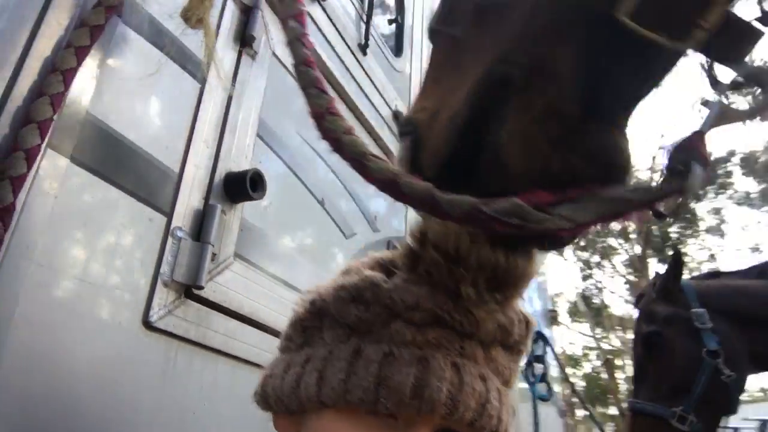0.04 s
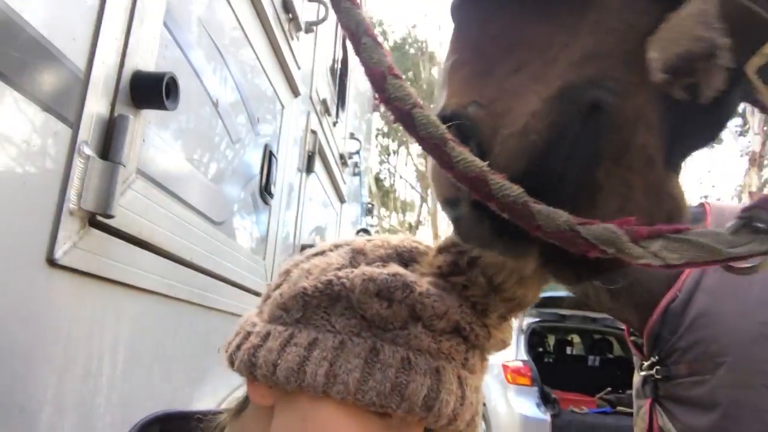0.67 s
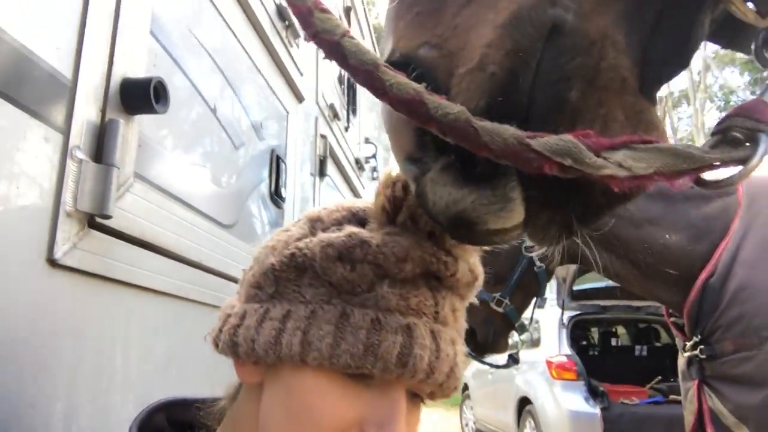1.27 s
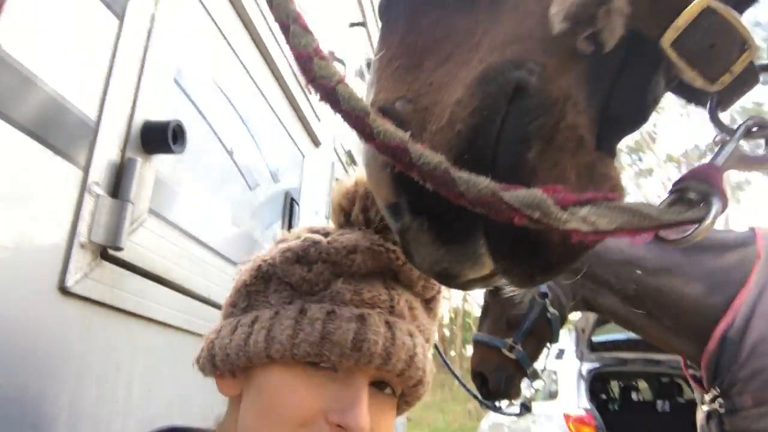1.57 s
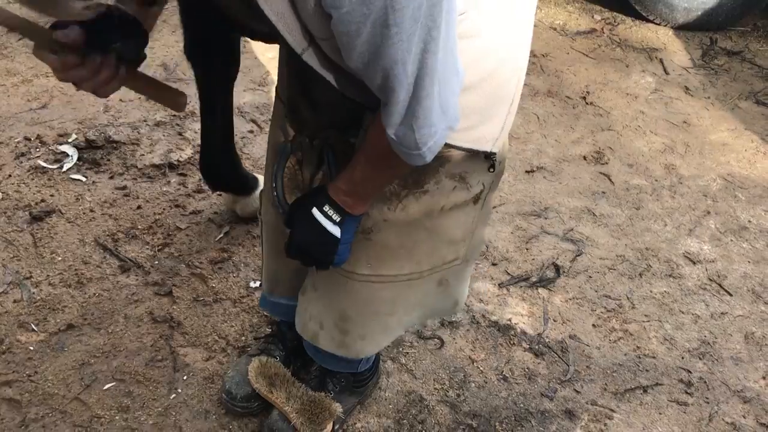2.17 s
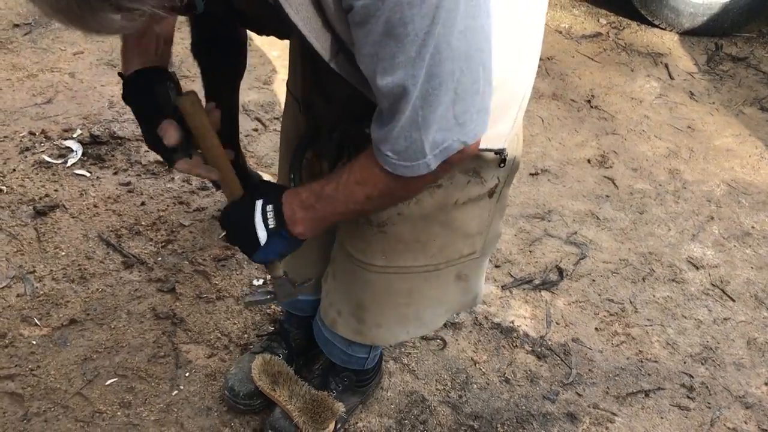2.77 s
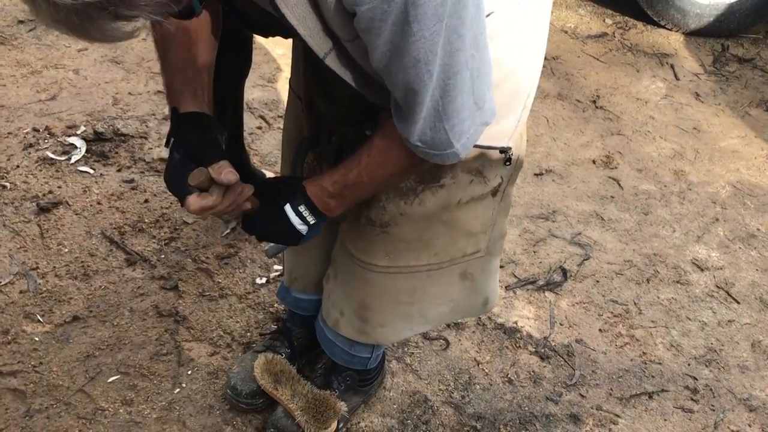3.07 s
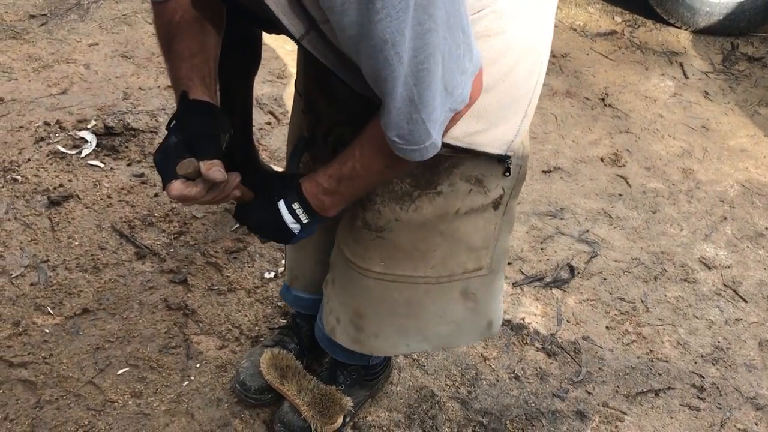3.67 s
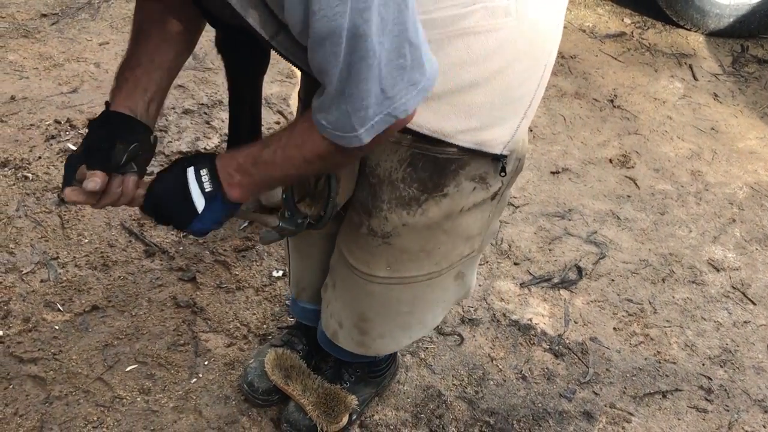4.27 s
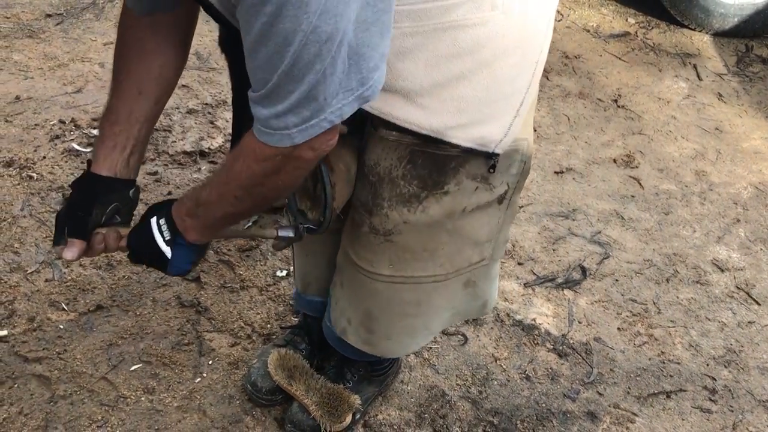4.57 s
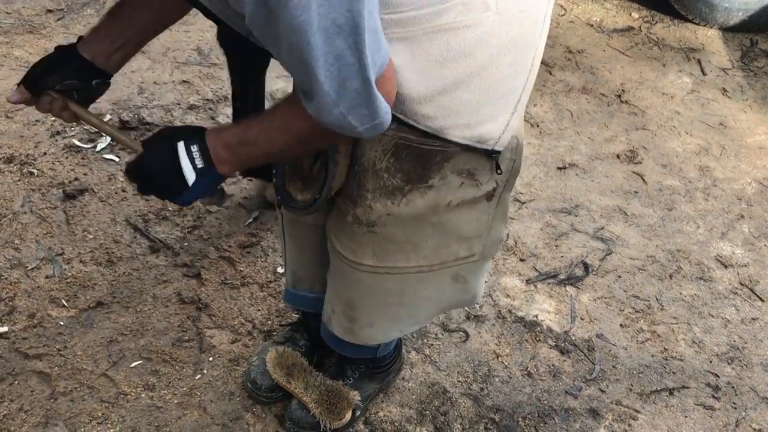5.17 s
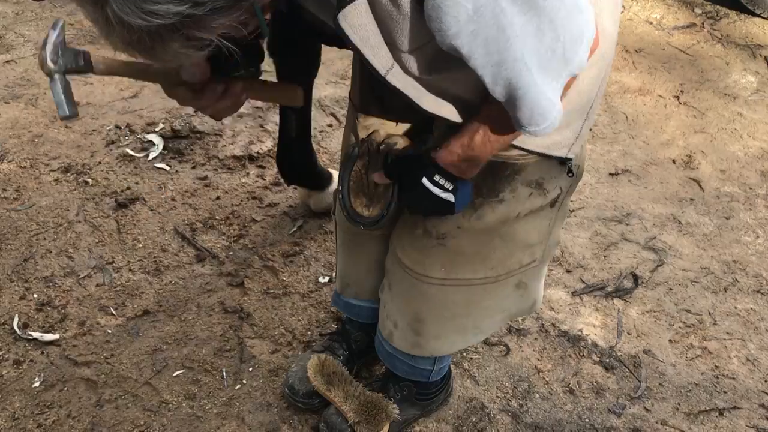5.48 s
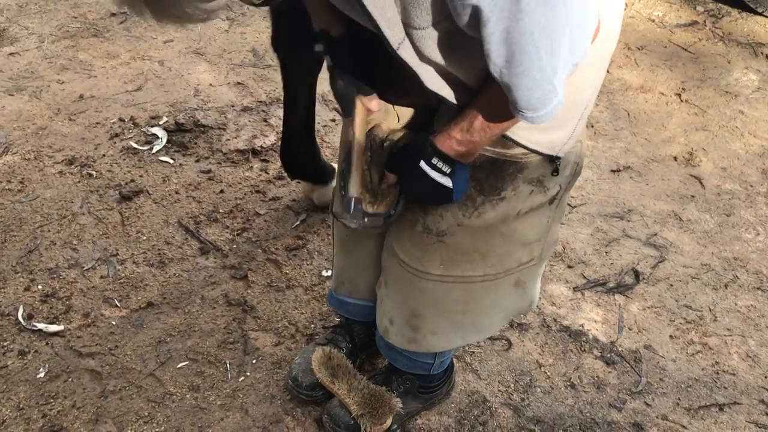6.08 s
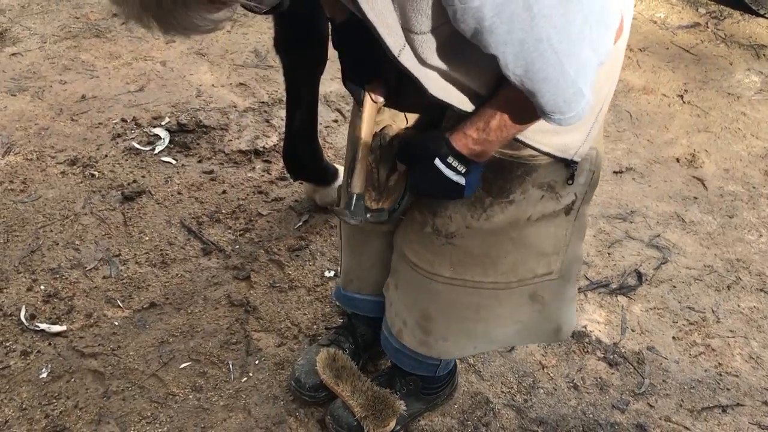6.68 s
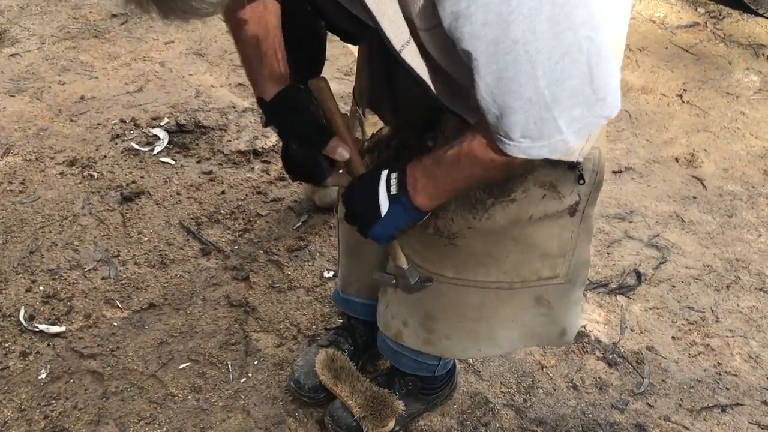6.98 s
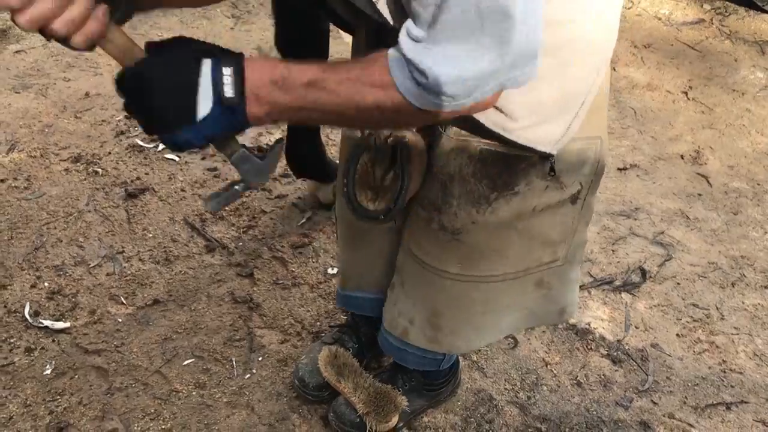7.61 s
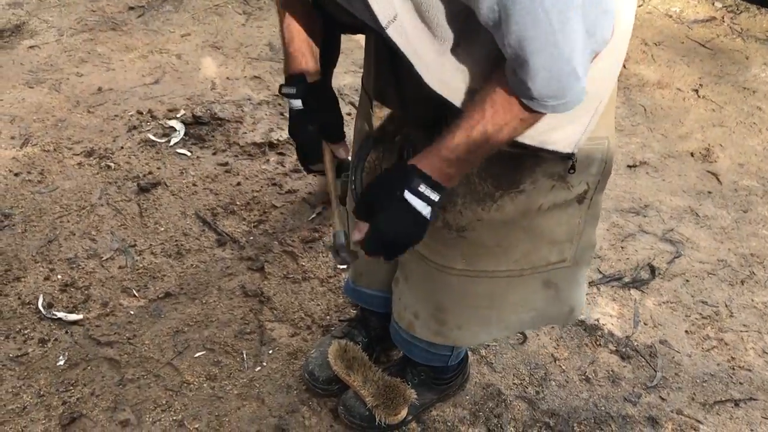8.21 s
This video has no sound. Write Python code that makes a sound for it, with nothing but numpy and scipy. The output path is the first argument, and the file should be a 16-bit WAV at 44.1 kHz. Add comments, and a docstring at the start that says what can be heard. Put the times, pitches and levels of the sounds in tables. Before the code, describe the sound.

Close to the microphone, a horse softly sniffs and nibbles at a woollen hat. Then a hammer strikes a nail into a horseshoe twice, with sharp, briefly ringing cracks. Small metal clicks, scrapes and the rustle of gloves and apron follow as nail tips are twisted off. Three more loud blows land, then light knocks and a low bump on the microphone. Faint wind and a distant bird lie behind.

```python
"""A farrier's hammer drives nails through a steel shoe into a hoof, outdoors, close to the microphone.
Each impact radiates a broadband crack, excites the modes of hoof, shoe and hammer, and overloads the
microphone. Between blows the claw wrings off nail tips while gloves and apron rustle by stick-slip
friction. Before the work begins the horse lips a woollen hat and sniffs it, a sound of turbulent air.
Light wind and a far bird lie behind."""
import sys
import numpy as np
from scipy import signal
from scipy.fft import rfft, irfft, next_fast_len
from scipy.io import wavfile

SR = 44100
rng = np.random.default_rng(int(sys.argv[2]) if len(sys.argv) > 2 else 0)


def generate_wav(sig):
    """Save sig (samples, or channels by samples) to the path in sys.argv[1] as 16-bit PCM at SR."""
    pcm = np.round(np.clip(np.atleast_2d(sig).T, -1, 1) * 32767).astype(np.int16)
    wavfile.write(sys.argv[1], SR, pcm)


N = 372644
TIME = np.arange(N) / SR
AGE = TIME[:SR]  # the first second of an event

# normal modes of hoof, shoe and hammer head: f/Hz, level/dB, t60/s
HOOF_MODES = [(113.2, -17, 0.12), (225.5, -11.5, 0.14), (324.4, -14, .12), (600, -10, 0.047),
              (886, -13, 0.11), (951, -5.5, 0.055), (1292, -12, 0.025), (2010, -35.5, 0.13),
              (2194, -31, 0.068), (2260, -14.5, .06)]
SHOE_MODES = [(1060, -17.5, 0.12), (2293, -24, 0.14), (3146, -10.5, 0.078), (4480, -19.5, .14),
              (5300, -22.5, .08), (6180, 1, 0.086), (5810, -7.5, 0.056), (6100, 3, 0.053),
              (6270, -35.5, 0.14), (7300, -19.5, .05), (7360, -4.5, 0.061), (8230, -24, .07),
              (9900, -24, 0.067), (10500, -28.5, .1), (10600, -21, 0.15)]
HAMMER_MODES = [(9650, -12, .11), (10213, 0, .14), (10236, -12, .23), (10900, -12, .13), (12020, -14, .1)]
# spectrum of a hard contact: f/Hz, level/dB
CRACK_SPECTRUM = [(40, -27), (150, -4), (400, -1), (1000, 0.5), (2000, 1.5), (4000, -2), (6400, 0.5),
                  (8300, -9.5), (12000, -5), (16000, -2)]
# steady rustle of the farrier's clothes: t/s, level/dB
RUSTLE_LEVELS = [(1.85, -65), (1.9, -49.5), (3.05, -54.5), (4.9, -52), (5.9, -55), (6.7, -53.5),
                 (7.25, -57), (7.85, -54), (8.0, -63.5), (8.45, -62.5)]


def hammering(hoof_db=-10.5, shoe_db=-11.5, far_db=-38, far_t60=0.56, yard_t60=0.19, sizzle_hz=12500):
    """Impact excites hoof, shoe and hammer; ground and trailer scatter the sound, far trees return it."""
    # blows and rebounds: t/s, level/dB, crack t60/s, tilt/(dB/octave), then relative to the blow
    # hammer ring/dB, yard/dB, sizzle/dB
    blows = [(1.9516, -2, .052, 0, -28, -39.5, -5.5), (1.9669, -3, 0.042, -2.5, -35, -20.5, -7),
             (2.0103, -23.5, 0.039, 0, -22, -30, -10), (2.4065, 6, 0.07, 0, -20, -15.5, -4.5),
             (5.7285, -1, 0.078, 0.8, -11, -20, 8.5), (6.1894, 0, 0.087, 0, -39, -30, 0),
             (6.2077, -2.5, .043, 4.5, -22.5, -18.5, -40), (6.239, -22.5, 0.066, -3, -28, -25, 5.5),
             (6.6687, 4.5, 0.063, -0.23, -20.5, -12.5, -17)]
    # spectra of the near and the far reflections: f/Hz, level/dB
    yard_spectrum = [(40, -15), (200, 6), (1000, 7.5), (2500, 6), (5000, 0.5), (6400, -0.5), (8300, -10),
                     (12000, -5.5), (16000, -5)]
    far_spectrum = [(100, 13), (800, 5.5), (2200, 4.5), (4500, 1), (6200, 16.5), (7500, -5), (11000, -7),
                    (16000, -3.5)]
    build_up = 1 - np.exp(-AGE / 0.012)  # reflections take time to gather
    out = np.zeros(N)
    for s, db, t60, tilt_db, hammer_db, yard_db, sizzle_db in blows:
        near, scattered, distant = rng.standard_normal((3, SR))
        hz = freqs(near)
        slope_db = tilt_db * np.log2(np.maximum(hz, 400) / 3000)
        top_db = sizzle_db / (1 + (sizzle_hz / hz) ** 10)  # steel on steel sizzles at the very top
        tone_db = slope_db + top_db + body_db(hz) + comb_db(hz, reflection=0.22)
        crack = colour(near, CRACK_SPECTRUM, tone_db) * decay(t60)
        hoof = undb(hoof_db) * ring(HOOF_MODES, detune=0.011)
        shoe = undb(shoe_db) * ring(SHOE_MODES)
        hammer = undb(hammer_db) * ring(HAMMER_MODES, detune=0.00065)
        yard = undb(yard_db) * colour(scattered, yard_spectrum, tone_db) * decay(yard_t60)
        far = undb(far_db) * colour(distant, far_spectrum) * decay(far_t60)
        add(out, s, undb(db) * (crack + hoof + shoe + hammer + build_up * (yard + far)))
    return out


def ring(modes, detune=0.0043, spread_db=1.5):
    """Free vibration is a sum of damped modes; grip and contact point vary their pitch and strength."""
    out = np.zeros(SR)
    for (hz, db, t60), (shift, strength, polarity) in zip(modes, rng.standard_normal((len(modes), 3))):
        age = AGE[AGE < 2 * t60]
        amplitude = np.sign(polarity) * undb(db + spread_db * np.tanh(strength) - 60 * age / t60)
        out[:len(age)] += amplitude * np.sin(2 * np.pi * hz * (1 + detune * shift) * age)
    return out


def body_db(hz):
    """Broad resonances of the shod hoof filter each impact."""
    # f/Hz, width/Hz, gain/dB
    resonances = [(3240, 280, 1.5), (4360, 280, 6), (5000, 250, -8), (6200, 210, 9.5), (7010, 500, 6),
                  (8360, 510, 7.5), (9580, 1100, 7), (12100, 760, 7.5)]
    return sum(db / (1 + (2 * (hz - centre) / width) ** 2) for centre, width, db in resonances)


def comb_db(hz, reflection):
    """Interference with one reflection from a hand or leg combs the spectrum."""
    lag_s = rng.uniform(0.0007, 0.0025)
    return 20 * np.log10(np.abs(1 + reflection * np.exp(2j * np.pi * hz * lag_s)))


def knock(db, low_db, treble_db, t60, tail_db=-27, tail_t60=0.28):
    """A brief contact radiates a noise burst with a faint reverberant tail; hard ones excite the modes."""
    noise = rng.standard_normal(SR)
    hz = freqs(noise)
    shelves_db = low_db / (1 + (hz / 600) ** 2) + treble_db / (1 + (6500 / hz) ** 4)
    shelves_db -= 5 / (1 + (13000 / hz) ** 10)
    contact = colour(noise, CRACK_SPECTRUM, shelves_db + body_db(hz) + comb_db(hz, reflection=0.8))
    envelope = decay(t60) + undb(tail_db) * decay(tail_t60)
    ring_db = 1.7 * db - 8 - max(low_db, 0)  # a dull contact damps the steel
    ringing = ring(SHOE_MODES) + undb(-7) * ring(HOOF_MODES, detune=0.014) + undb(-12) * ring(HAMMER_MODES)
    return undb(db) * contact * envelope + undb(ring_db) * ringing


def knocks(tap_db=-24.5, tap_low_db=29, thinning=1.9):
    """Light impacts, single or in pairs just before most blows; a harder tap has a less dull spectrum."""
    # tools, hoof and the horse's lips: t/s, level/dB, low shelf/dB, treble shelf/dB, t60/s
    contacts = [(.696, -38, 19, -21, 0.1), (0.751, -35.5, 24.5, -7, 0.082), (.851, -35.5, 27, -5, 0.082),
                (1.111, -35, 11, -24, 0.096), (3.1185, -5, -15, -10, .03), (3.463, -33.5, 15, -14, 0.049),
                (3.634, -34, -10, 22, .037), (3.651, -17, -4, -18, 0.024), (3.786, -30.5, 0, -4, 0.034),
                (3.873, -33, 6, -9, 0.11), (3.994, -33.5, 11, -15, 0.039), (4.276, -32.5, -11, -26, 0.015),
                (4.3624, -18.5, -30, -51, 0.016), (4.4603, -25.5, -36, -31, 0.0093),
                (4.924, -12, 13.5, -10.5, 0.015), (4.932, -24.5, 22, -11, 0.085),
                (4.947, -26.5, -6, 25, 0.085), (4.987, -25.5, 22, 13, 0.049), (5.053, -28.5, 31, 6, 0.056),
                (5.321, -24, -7, -1, 0.026), (5.392, -27, -2, 15, .03), (7.152, -31, -45, -28, 0.024),
                (7.328, -32, 26, -3, 0.057), (7.484, -23, 28.5, 3, 0.06), (7.491, -19, 11, 17, 0.027),
                (7.604, -23.5, -2, -2, 0.029), (7.896, -38.5, -14, -32, 0.038),
                (8.108, -35.5, 16, -22, 0.072)]
    # pairs of dull taps: t/s, gap/s, second tap above the first/dB
    tap_pairs = [(1.929, 0.011, 3.5), (2.382, 0.013, 0.5), (6.168, 0.01, 0), (6.64, 0.0084, 4.5)]
    out = np.zeros(N)
    for s, db, low_db, treble_db, t60 in contacts:
        add(out, s, knock(db, low_db, treble_db, t60))
    for s, gap, second_db in tap_pairs:
        for onset, harder_db in [(s, 0), (s + gap, second_db)]:
            low_db = tap_low_db - thinning * harder_db
            add(out, onset, knock(tap_db + harder_db, low_db, treble_db=-4.5, t60=0.06))
    return out


def slides(lead_t60=0.27, head_db=-7):
    """Sliding friction drives the modes of hammer head and shoe; one mode of the head takes the lead."""
    # t/s, length/s, drive level/dB, lead f/Hz, relative shoe level/dB
    strokes = [(3.237, 0.052, -41, 10240, -5.5), (3.281, 0.046, -56, 10800, 7),
               (4.959, 0.044, -36.5, 10800, -7), (5.05, 0.01, -31, 10200, -13)]
    out = np.zeros(N)
    for s, length, db, hz, shoe_db in strokes:
        force = np.sin(np.pi * np.minimum(AGE / length, 1)) * rng.standard_normal(SR)
        lead_mode = np.sin(2 * np.pi * hz * AGE) * decay(lead_t60)
        responses = lead_mode, ring(HAMMER_MODES, spread_db=6), ring(SHOE_MODES)
        lead, head, shoe = (unit(signal.fftconvolve(force, response)[:SR]) for response in responses)
        add(out, s, undb(db) * np.sqrt(length) * (lead + undb(head_db) * head + undb(shoe_db) * shoe))
    return out


def scrapes(chatter_db=3, glide=0.0385):
    """Stick-slip motion excites a hollow resonance that rises a little as the contact moves."""
    # lips on wool, claw on hoof, nail in horn, hoof on apron: t/s, length/s, f/Hz, width/Hz, level/dB
    contacts = [(0, 0.04, 358, 40, -44), (0.217, 0.044, 423, 200, -41.5), (0.438, .055, 492, 200, -47.5),
                (.898, 0.038, 3800, 1200, -40), (3.221, .1, 1693, 1580, -41.5),
                (3.252, 0.075, 3670, 2600, -44), (3.374, 0.083, 761, 350, -44),
                (3.483, 0.14, 3500, 750, -48), (3.745, 0.071, 950, 595, -47),
                (3.867, .078, 1424, 400, -49.5), (3.963, 0.16, 820, 200, -53.5),
                (4.403, .1, 1895, 1490, -42), (4.409, 0.037, 516, 250, -46),
                (4.582, 0.055, 2730, 1520, -42), (4.61, 0.11, 266.4, 131, -42.5),
                (4.624, 0.093, 820, 450, -41.5), (4.783, .1, 3240, 1800, -40), (5.721, 0.03, 428, 380, -20),
                (7.059, .069, 8100, 7000, -44.5)]
    out = np.zeros(N)
    for s, length, hz, width_hz, db in contacts:
        strength = undb(db + chatter_db * wander(201)[:SR])
        add(out, s, strength * gliding_band(hz * (1 - glide), hz * (1 + glide), width_hz, length))
    return out


def friction(rustle_hiss_db=-1):
    """Incoherent strokes and steady rustle add in power, giving coarse and fine rubbing envelopes."""
    # glove, apron and claw: t/s, length/s, level/dB, relative hiss/dB
    strokes = [(2.04, .3, -52, 2), (2.6, 0.25, -49.5, -1.5), (3.23, 0.12, -45, -4),
               (3.39, 0.41, -47, -10.5), (3.87, 0.31, -51, -1.5), (4.13, 0.12, -52.5, 0),
               (4.28, .23, -47.5, 0), (4.68, 0.42, -42.5, -10), (4.8, 0.12, -48, 0), (4.92, 0.15, -59, 1),
               (5.2, 0.3, -43, -5), (5.3, 0.13, -33.5, -5.5), (5.52, 0.079, -46, -7.5),
               (6.831, 0.17, -45, -15), (7.03, 0.066, -48.5, -1), (7.39, 0.18, -54.5, -2),
               (7.582, 0.1, -49.5, -0.5), (7.77, 0.13, -61, 7), (8.1, 0.055, -48.5, -1.5)]
    coarse_power = undb(curve(RUSTLE_LEVELS)) ** 2
    fine_power = coarse_power * undb(rustle_hiss_db) ** 2
    for s, length, db, hiss_db in strokes:
        stroke = undb(db) * swell(s, length, attack_s=0.024, t60=0.13)
        coarse_power += stroke ** 2
        fine_power += (stroke * undb(hiss_db)) ** 2
    return np.sqrt(coarse_power), np.sqrt(fine_power)


def rubbing(coarse, fine, catch_db=1.5, scrape_db=-0.5, hiss_db=2, scuff_db=-3):
    """Asperities of leather, cloth and steel catch and slip: a scrape, a fine hiss and a dull scuff."""
    # f/Hz, level/dB
    friction_spectrum = [(150, -5), (250, 1.5), (528, -10.5), (651, -3.5), (875, -6), (1730, -11.5),
                         (3400, -8.5), (4820, -11), (10000, -10.5), (10900, -12), (15200, -11),
                         (16000, -12)]
    grains = colour(grainy_noise(), friction_spectrum)[:N]
    scuff = np.sqrt(coarse * undb(curve(RUSTLE_LEVELS)))  # grows half as fast in dB as the scrape
    bands = [((1200, 6500), coarse, scrape_db), ((6500, 16000), fine, hiss_db),
             ((180, 1200), scuff, scuff_db)]
    out = np.zeros(N)
    for edges_hz, envelope, db in bands:
        band = signal.sosfilt(signal.butter(3, edges_hz, "band", fs=SR, output="sos"), grains)
        out += unit(band) * envelope * undb(db + catch_db * wander(60))
    return out


def crackle(effort, count=800, over_db=3, spread_db=3.5, t60_cycles=3.3):
    """Sudden release of wool fibres, grit and stiff leather gives damped ticks that scale with effort."""
    out = np.zeros(N)
    age = AGE[:1024]
    for when, pitch, size in rng.random((count, 3)):
        hz = 2000 * 2 ** (2.8 * pitch)
        tick = np.sin(2 * np.pi * hz * age) * undb(-60 * age * hz / t60_cycles)
        strength = effort[int(when * N)] * undb(over_db - spread_db * np.log(size + 0.022))
        add(out, when * N / SR, strength * tick)
    return out


def squeaks(effort, count=150, gain_db=-6, low_hz=650, octaves=4, bend_hz=200, length_s=0.063):
    """Periodic stick-slip makes leather and horn sing briefly, louder where the rubbing is hard."""
    out = np.zeros(N)
    age = AGE[AGE < length_s]
    envelope = np.sin(np.pi * age / length_s)
    for when, pitch, size, bend in rng.random((count, 4)):
        hz = low_hz * 2 ** (octaves * pitch) + bend_hz * (2 * bend - 1) * age / length_s
        chirp = envelope * np.sin(2 * np.pi * np.cumsum(hz) / SR)
        add(out, when * N / SR, effort[int(when * N)] * undb(gain_db) * size * chirp)
    return out


def airflow():
    """Flow envelope at the horse's nostrils: sniffs start quickly, trail off and add in power."""
    # t/s, length/s, level/dB
    breaths = [(-.02, 0.077, -47.5), (0.218, 0.1, -34.5), (0.715, .09, -54), (0.86, .05, -43.5),
               (0.891, 0.033, -34), (0.965, 0.027, -42), (1.23, 0.089, -54.5), (1.353, 0.036, -51.5),
               (1.475, 0.11, -39.5), (1.592, 0.08, -42)]
    flows = (undb(db) * swell(s, length, attack_s=0.013, t60=0.29) for s, length, db in breaths)
    return np.sqrt(sum(flow ** 2 for flow in flows))


def sniffs(flow, flutter_db=1.6, hollow_db=-11, flare_db=4.6):
    """Turbulent air rushes through nostrils and wool; the passages resonate unevenly as they flare."""
    # f/Hz, level/dB
    breath_spectrum = [(150, -28.5), (250, -25), (287, -16), (319, -2), (436, 5.5), (831, -3), (1260, -0.5),
                       (2240, -0.5), (3840, 2.5), (6590, 2.5), (14400, -13), (16000, -4)]
    air = colour(grainy_noise(), breath_spectrum)[:N]
    for centre_hz, width_hz in [(1350, 700), (2800, 1000), (4600, 2800)]:
        passage = resonate(rng.standard_normal(N), centre_hz, width_hz)
        air += unit(passage) * undb(hollow_db + flare_db * wander(25))
    return unit(air) * flow * undb(flutter_db * wander(90))


def bird(blur_hz=170):
    """Scattering by trees blurs a far bird's thin falling whistles into narrow bands of noise."""
    # t/s, length/s, start f/Hz, end f/Hz, level/dB
    whistles = [(6.344, .06, 2700, 2570, -54), (6.516, 0.065, 2670, 2500, -56),
                (7.81, 0.084, 2680, 2390, -53), (7.989, 0.07, 2650, 2500, -54.5),
                (8.137, 0.039, 1740, 1700, -49), (8.397, 0.077, 3150, 2845, -55)]
    out = np.zeros(N)
    for s, length, start_hz, end_hz, db in whistles:
        add(out, s, undb(db) * gliding_band(start_hz, end_hz, blur_hz, length))
    return out


def bumps():
    """Soft pushes of air and hand on the microphone set off damped low oscillations."""
    # t/s, f/Hz, level/dB, t60/s
    pushes = [(0.41, 206, -43.5, 0.16), (0.438, 298, -26, 0.025), (1.141, 55.4, -25, 0.15),
              (1.161, 136, -24, 0.041), (1.249, 69, -25.5, 0.11), (4.669, 187, -31, 0.17),
              (8.104, 88, -20, 0.082), (8.139, 55, 0, 0.049), (8.167, 189, -10, 0.019),
              (8.205, 65.4, -17, 0.081), (8.243, 129, -3.5, 0.023)]
    out = np.zeros(N)
    for s, hz, db, t60 in pushes:
        envelope = (1 - np.exp(-AGE * 2 * hz)) * decay(t60)
        add(out, s, undb(db) * envelope * np.sin(2 * np.pi * hz * AGE))
    return out


def outdoors(air_db=-53.5, drone_db=-52, breeze_db=-57, wind_gain_db=-2, buffet_db=2.5):
    """Turbulent wind pressure rumbles on the microphone over the hiss and drone of the countryside."""
    # f/Hz, level/dB
    air_spectrum = [(40, -35.5), (100, -19), (210, -7), (400, -10), (800, -13), (1500, -16), (3000, -18),
                    (5000, -23), (6400, -22.5), (10500, -38), (14500, -31), (16000, -39)]
    wind_spectrum = [(15, -30.5), (28, -20), (40, -10.5), (54, 8), (75, -8.5), (120, -13.5), (200, -16),
                     (500, -81)]
    drone_spectrum = [(30, -24), (60, -9), (88, -3.5), (130, -14.5), (220, -18.5), (500, -63)]
    # t/s, length/s, level before the wind gain/dB
    gusts = [(-.05, 0.088, -59), (.25, 0.32, -48), (.72, .55, -47), (1.52, 0.22, -49), (4.506, .22, -47),
             (4.91, 0.047, -37), (5.695, 0.069, -40.5), (6.175, 0.054, -37.5), (6.64, 0.13, -41),
             (7.3, 0.17, -51), (7.722, 0.21, -43.5), (8.082, 0.1, -26.5)]
    hiss = colour(long_noise(), air_spectrum)[:N] * undb(air_db + 0.3 * wander(1.1))
    drone = colour(long_noise(), drone_spectrum)[:N] * undb(drone_db)
    gusting = sum(undb(db) * swell(s, length, attack_s=0.028, t60=0.27) for s, length, db in gusts)
    wind = colour(long_noise(), wind_spectrum)[:N] * (undb(breeze_db) + gusting)
    return hiss + drone + wind * undb(wind_gain_db + buffet_db * wander(8.9))


def gliding_band(start_hz, end_hz, width_hz, length):
    """Random modulation widens a gliding tone into one swell of narrow-band noise."""
    progress = np.minimum(AGE / length, 1)
    lowpass = signal.butter(2, width_hz / 2, fs=SR, output="sos")
    sway = signal.sosfilt(lowpass, rng.standard_normal((2, SR)))
    phase = 2 * np.pi * np.cumsum(start_hz + (end_hz - start_hz) * progress) / SR
    return np.sin(np.pi * progress) * unit(sway[0] * np.cos(phase) + sway[1] * np.sin(phase))


def resonate(x, hz, width_hz):
    """Response of a second-order resonator to x."""
    return signal.lfilter(*signal.iirpeak(hz, hz / width_hz, fs=SR), x)


def grainy_noise(grain_db=3.5):
    """Impulsive noise: dense tiny clicks of unequal size."""
    noise = long_noise()
    size = np.minimum(rng.exponential(size=len(noise)), 7.5)
    return noise * undb(grain_db * size)


def long_noise():
    """White noise a little longer than the scene."""
    return rng.standard_normal(next_fast_len(N, True))


def colour(x, spectrum, extra_db=0):
    """Filter x by a spectrum of (f/Hz, level/dB) points, to rms 1."""
    hz, db = np.transpose(spectrum)
    gain_db = np.interp(np.log(freqs(x)), np.log(hz), db) + extra_db
    return unit(irfft(rfft(x) * undb(gain_db), len(x)))


def freqs(x):
    """Frequencies of the spectrum of x, at least 1 Hz."""
    return np.maximum(np.fft.rfftfreq(len(x), 1 / SR), 1)


def swell(s, length, attack_s, t60):
    """Linear rise from time s, hold to the end of the length, then exponential decay."""
    age = TIME - s
    return np.clip(age / attack_s, 0, 1) * undb(-60 * np.clip((age - length) / t60, 0, 2))


def decay(t60):
    """Exponential decay by 60 dB in t60 seconds."""
    return undb(-60 * AGE / t60)


def wander(rate_hz):
    """Random fluctuation, interpolated between rate_hz points a second."""
    points = rng.standard_normal(8192)
    return 1.7 * np.interp(TIME * rate_hz, np.arange(len(points)), points)


def curve(rows):
    """Linear interpolation of (t/s, value) rows."""
    return np.interp(TIME, *np.transpose(rows))


def undb(db):
    """Decibels to amplitude ratio."""
    return 10 ** (np.asarray(db) / 20)


def unit(x):
    """Scale to rms 1."""
    return x / np.sqrt(np.mean(x ** 2))


def add(out, s, x):
    """Superpose x on out from time s."""
    start = max(int(s * SR), 0)
    out[start:start + len(x)] += x[:max(N - start, 0)]


def scene():
    """The pressures of all sources superpose at one microphone."""
    flow = airflow()
    coarse, fine = friction()
    handling = rubbing(coarse, fine) + crackle(flow + coarse) + squeaks(coarse) + scrapes() + slides()
    return (hammering() + knocks() + handling + sniffs(flow) + bird() + outdoors() + bumps())[None]


def record(dry, dip_hz=10560, dip_depth=0.31, bass_hz=34, top_hz=15950, tick_db=-13.5):
    """A band-limited microphone with a treble dip saturates on the blows; the sound drops out twice."""
    # brief silences: start t/s, end t/s
    dropouts = [(1.864, 1.888), (5.465, 5.489)]
    dipped = dry - dip_depth * resonate(dry, dip_hz, width_hz=480)
    heard = signal.sosfilt(signal.butter(3, bass_hz, "high", fs=SR, output="sos"), dipped)
    for start, end in dropouts:
        heard[:, (TIME > start) & (TIME < end)] = 0
    add(heard[0], dropouts[0][0], undb(tick_db) * np.array([1, -1]))  # the first starts with a tick
    clipped = np.clip(heard, -0.97, 0.97)
    return signal.sosfiltfilt(signal.ellip(8, 0.1, 45, top_hz, fs=SR, output="sos"), clipped)


dry = scene()
out = record(dry)
generate_wav(out)
```